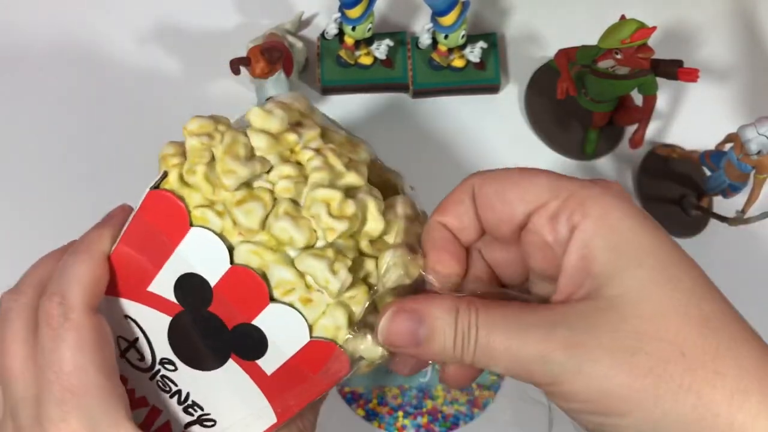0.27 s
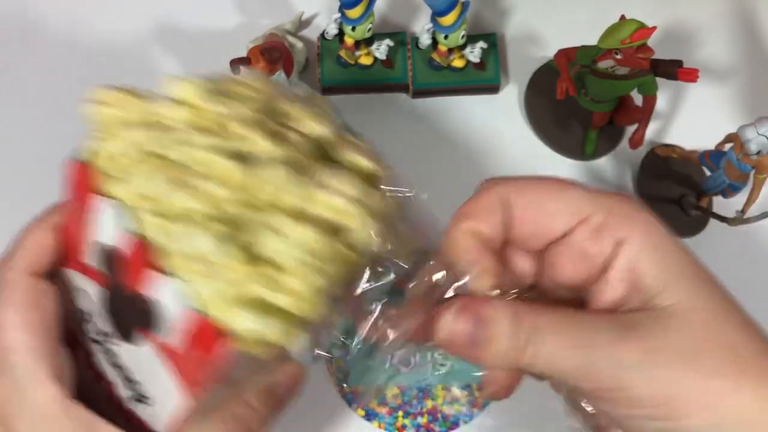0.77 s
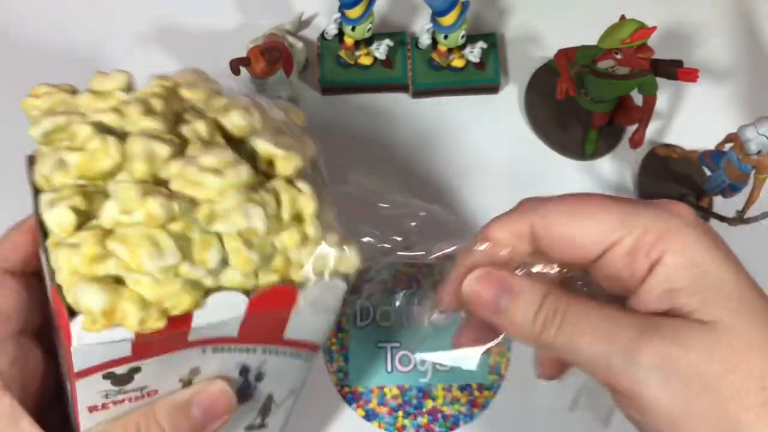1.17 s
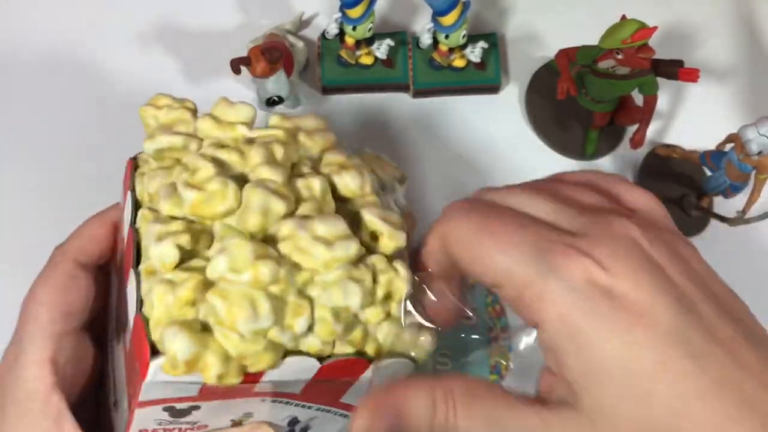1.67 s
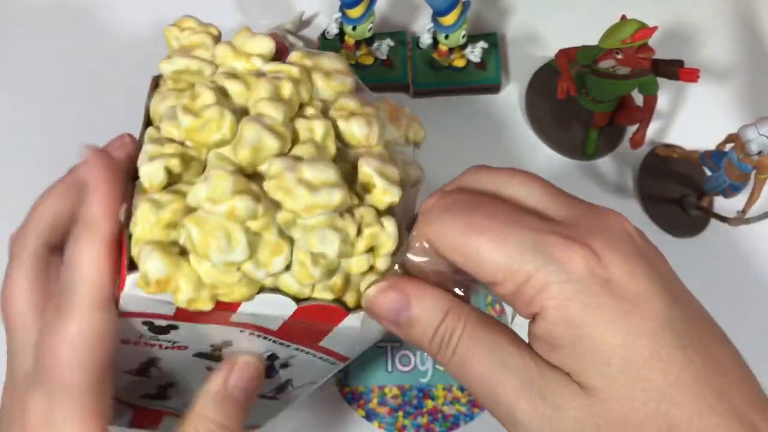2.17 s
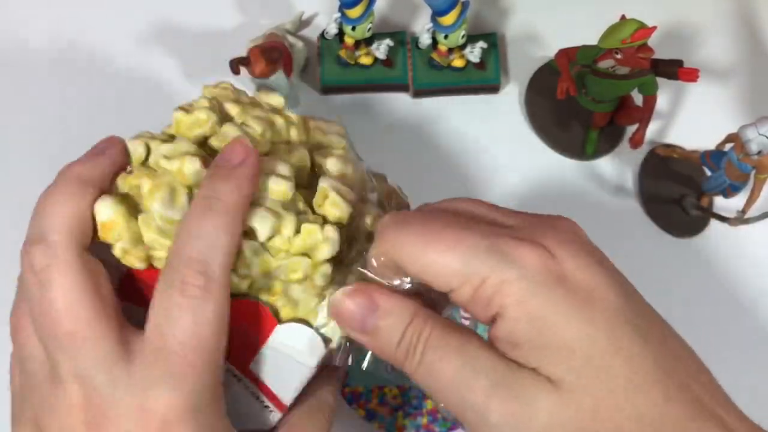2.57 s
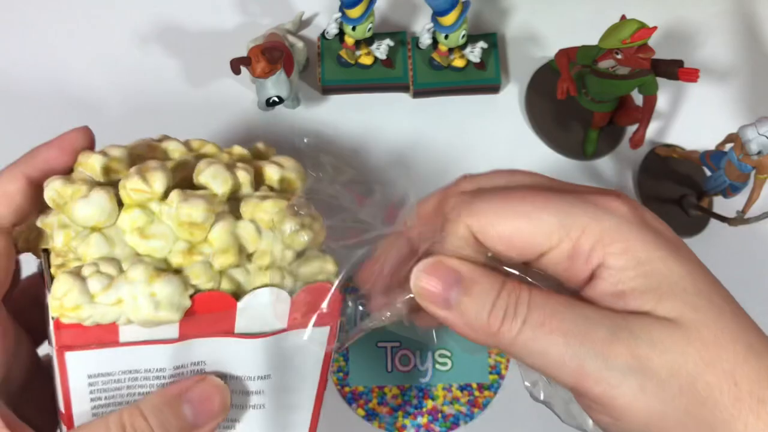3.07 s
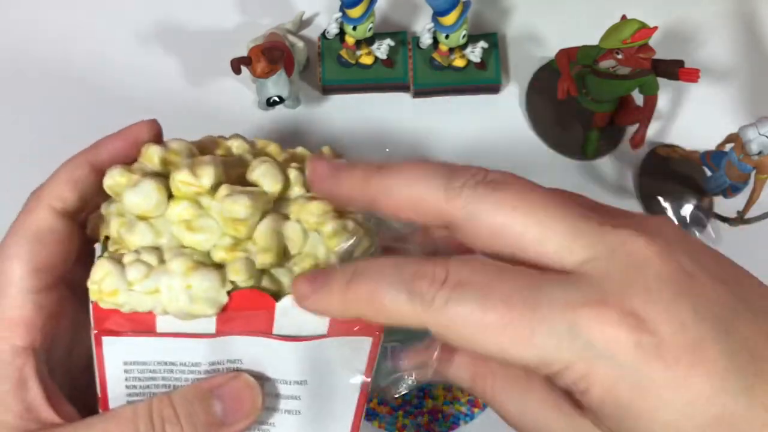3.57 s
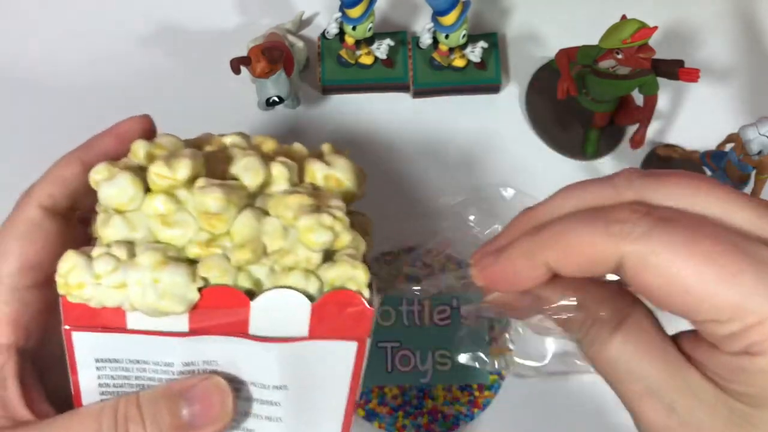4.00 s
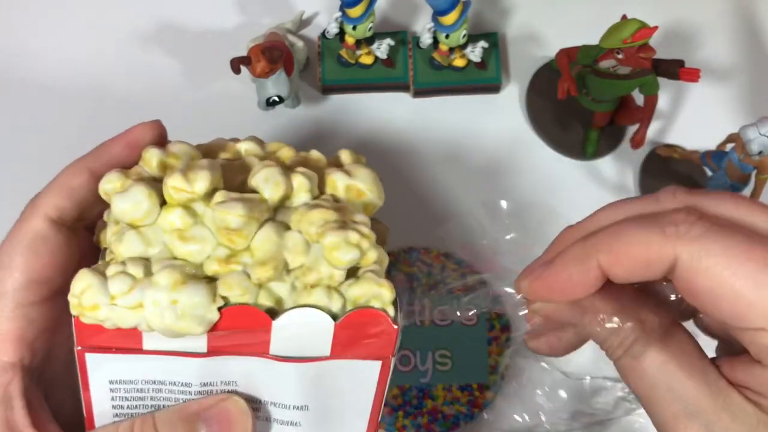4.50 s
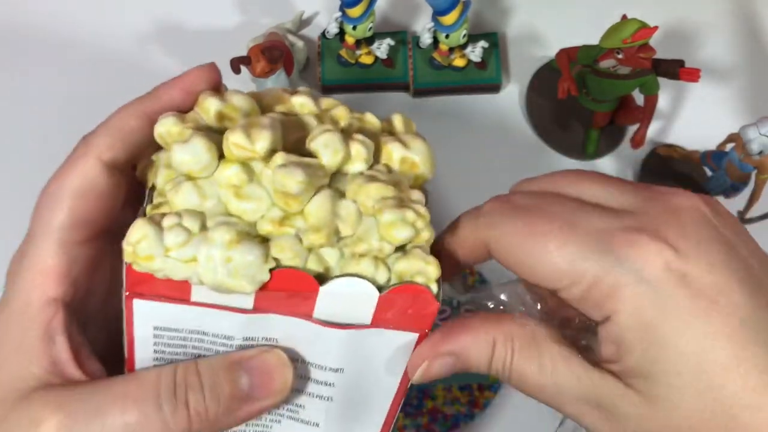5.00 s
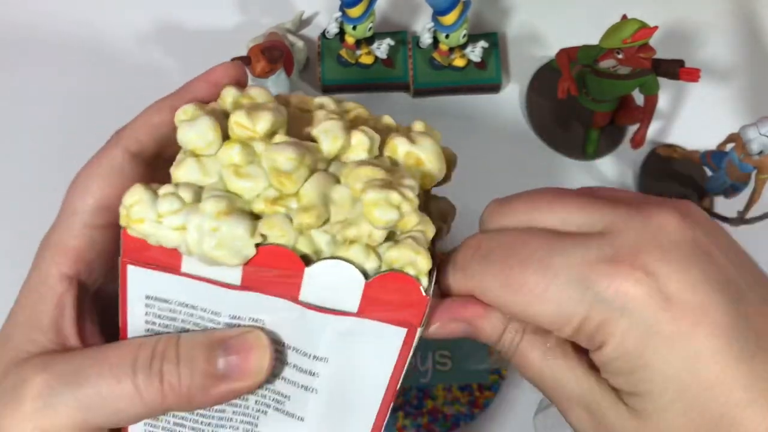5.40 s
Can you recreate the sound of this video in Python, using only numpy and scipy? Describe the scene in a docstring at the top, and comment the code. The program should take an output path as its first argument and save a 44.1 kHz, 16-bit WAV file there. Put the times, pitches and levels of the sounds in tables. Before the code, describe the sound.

Hands work thin stiff plastic film off a light cardboard box, heard very close in a small room. Scattered crackles lead to one loud ripping burst before one second, then uneven crinkling, a quieter lull of small ticks, a second loud flurry near three seconds, and looser rustling with dull finger bumps until two last sharp snaps.

```python
"""In a small room, close by, hands peel clear plastic film off a cardboard box.
Each crease that buckles is a burst of noise lasting milliseconds, which rings a facet of film and knocks the box.
With every pull, tiny creases crackle and the film rustles over itself as a train of random impulses.
The fingers bump the box with soft resonant swells; the box rings on, the walls answer, the air murmurs."""
import sys
import numpy as np
from scipy import signal
from scipy.fft import rfft, irfft, next_fast_len
from scipy.io import wavfile

SR = 44100
rng = np.random.default_rng(int(sys.argv[2]) if len(sys.argv) > 2 else 0)


def write(x):
    x = np.atleast_2d(x).T
    wavfile.write(sys.argv[1], SR, np.round(np.clip(x, -1, 1) * 32767).astype(np.int16))


N = 249165


def from_db(db):
    """Amplitude ratio: twenty decibels are a factor of ten."""
    return 10 ** (np.asarray(db) / 20)


def unit_energy(x):
    """Energy normalisation: the squares of each row sum to one."""
    return x / np.sqrt(np.sum(x ** 2, axis=-1, keepdims=True) + 1e-20)


def rms_one(x):
    """Power normalisation: the mean square becomes one."""
    return unit_energy(x) * np.sqrt(len(x))


def normal(*shape):
    """Gaussian scatter, limited to two standard deviations."""
    return np.clip(rng.standard_normal(shape), -2, 2)


def at_hz(points, hz):
    """Log-frequency interpolation: a spectrum runs straight between its points."""
    known_hz, values = np.transpose(points)
    return np.interp(np.log(np.maximum(hz, 1)), np.log(known_hz), values)


def coloured(x, points):
    """Minimum phase: folding the cepstrum gives the causal filter with a given spectrum."""
    size = next_fast_len(x.shape[-1]) * 2
    gain = from_db(at_hz(points, np.fft.rfftfreq(size, 1 / SR)))
    cepstrum = irfft(np.log(gain))
    cepstrum[1:size // 2] *= 2
    cepstrum[size // 2 + 1:] = 0
    response = np.exp(rfft(cepstrum))
    return irfft(rfft(x, size) * response)[..., :x.shape[-1]]


def resonance(x, hz, width_hz):
    """Damped resonance: a pole pair, with a gain of one at its peak."""
    radius = np.exp(-np.pi * width_hz / SR)
    zeros = np.array([1, 0, -1]) * (1 - radius ** 2) / 2
    poles = [1, -2 * radius * np.cos(2 * np.pi * hz / SR), radius ** 2]
    return signal.lfilter(zeros, poles, x + 1e-18)


# Spectrum of the still room. Each row: frequency in Hz, relative density in dB per Hz.
AIR = [(15, -8), (35, 6), (55, -7.5), (90, -13.5), (140, -17), (230, -9.5), (400, -12), (700, -19.5),
       (2000, -24), (8000, -32), (16000, -45)]


def air(level_db=-56):
    """Stationary background noise: Gaussian noise shaped by a fixed spectrum."""
    return from_db(level_db) * rms_one(coloured(rng.standard_normal(N), AIR))


# Colour of the sound thrown back by the walls. Each row: frequency in Hz, gain in dB.
ROOM_COLOUR = [(100, 3.5), (400, 4), (2800, -3.5), (6000, 0), (10000, -6), (16000, -8)]
# Reverberation time of the room. Each row: frequency in Hz, time to fall by 60 dB in seconds.
ROOM_T60 = [(150, 0.24), (1000, 0.39), (3500, 0.4), (8000, 0.22), (16000, 0.39)]


def room(x, wet_db=-10.5, first_echo_s=0.0015):
    """Reverberation: diffuse echoes are noise that decays exponentially, at its own rate in each band."""
    t = np.arange(SR // 2) / SR
    edges_hz = np.r_[0, np.geomspace(200, SR / 2, num=9)]
    hz = np.fft.rfftfreq(len(t), 1 / SR)
    echoes = rfft(rng.standard_normal(len(t)))
    tail = 0
    for low, high in zip(edges_hz, edges_hz[1:]):
        band = irfft(echoes * ((hz >= low) & (hz < high)), len(t))
        t60_s = at_hz(ROOM_T60, (low + high) / 2)
        tail = tail + band * np.exp(-np.log(1000) * t / t60_s)
    onset = np.clip(t / first_echo_s - .5, 0, 1)
    tail = coloured(unit_energy(tail * onset), ROOM_COLOUR)
    return from_db(wet_db) * signal.fftconvolve(x, tail)[:N]


def turning_walls(x, turn_hz=0.746):
    """Changing direction: as the sheet turns it faces different walls, so two echo patterns trade places."""
    angle = 2 * np.pi * turn_hz * np.arange(N) / SR
    return room(x * np.cos(angle)) + room(x * np.sin(angle))


# Fingers bump and rub the box. Each row: start in seconds, rms level in dB, pitch in Hz, length in seconds.
GRIP = [(1.153, -37, 298, 0.032), (1.202, -60, 65, .12), (1.53, -48.5, 94.5, 0.042),
        (1.773, -56, 51.3, 0.3), (1.799, -40.5, 322.6, 0.019), (2.147, -54.5, 603, 0.058),
        (2.273, -55.5, 197, 0.055), (2.406, -57.5, 553, .11), (2.615, -64, 64.5, 0.18),
        (2.734, -41.5, 980, 0.037), (2.816, -42, 410, 0.054), (3.15, -50.5, 192, 0.089),
        (3.215, -53, 232, 0.041), (3.438, -47, 212.2, 0.046), (3.773, -42.5, 376, 0.046),
        (4.093, -47.5, 416, 0.032), (4.651, -46, 210.4, 0.033), (4.782, -42, 157, 0.032),
        (5.011, -50.5, 844, 0.058), (5.501, -52, 665, 0.068), (5.569, -33, 403, 0.056)]


def fingers(width=0.9):
    """Soft contact: skin spreads the force over time, so noise swells dully in a broad resonance."""
    out = np.zeros(N + SR)
    for s, level_db, hz, length_s in GRIP:
        swell = np.sin(np.pi * np.linspace(0, 1, int(length_s * SR)) ** 0.64) ** 2
        push = resonance(rng.standard_normal(SR), hz, width * hz)
        push = resonance(push, hz, width * hz)[-len(swell):]
        start = int(s * SR)
        out[start:start + len(swell)] += from_db(level_db) * rms_one(push * swell)
    return out[:N]


# Resonances of the box. Each row: frequency in Hz, width in Hz, gain in dB relative to one another.
BOX = [(365, 35, -3.5), (469, 18, -0.5), (583, 80, -5.5), (711, 15, 2), (886.6, 27, 9.5), (1260, 11, -30)]


def box(x, level_db=-3.0):
    """Modal resonance: the film excites the modes of the hollow box, which ring on briefly."""
    modes = sum(from_db(db) * resonance(x, hz, width_hz) for hz, width_hz, db in BOX)
    return from_db(level_db) * modes


# The hands pull, peel or gather the film. Each row: start in seconds, hold in seconds, effort in dB,
# pitch in Hz of the facet that the grip leaves free to ring.
PULLS = [(0, 0.018, -30.5, 2830), (0.243, 0.06, -38, 2692), (0.42, 0.051, -38, 2980),
         (0.538, 0.059, -43.5, 4600), (0.764, 0.037, -19, 3770), (0.931, 0.078, -42.5, 2570),
         (1.052, 0.11, -36.5, 3800), (1.236, 0.033, -48, 3800), (1.449, 0.048, -32, 3390),
         (1.541, 0.0079, -29.5, 3260), (1.73, 0.059, -44, 2640), (1.94, .06, -49.5, 3070),
         (2.084, 0.28, -53, 2850), (2.543, 0.054, -42, 2330), (2.764, 0.13, -36, 2790),
         (3.125, 0.0723, -47, 3880), (3.296, 0.2, -40.5, 3970), (3.647, 0.2, -35, 3850),
         (4.028, 0.052, -48, 2680), (4.547, 0.24, -35, 3970), (4.923, 0.031, -52.5, 2280),
         (5.17, 0.068, -44, 2280), (5.55, 0.014, -47, 3840)]


def effort(s, tighten_s=0.022, relax_s=0.033, held_db=-65):
    """Power addition: each pull tightens, holds and relaxes exponentially, over the stir of held film (dB)."""
    power = from_db(held_db) ** 2
    for start, hold_s, level_db, _ in PULLS:
        before = np.maximum(start - s, 0) / tighten_s
        after = np.maximum(s - start - hold_s, 0) / relax_s
        power = power + (from_db(level_db) * np.exp(-before - after)) ** 2
    return 10 * np.log10(power)


def facet_pitch(s, spread):
    """Free vibrating area: the nearest pull frees a facet and sets its pitch, scattered in octaves."""
    start, hold_s, _, hz = np.transpose(PULLS)
    distance = np.abs(s[:, None] - start - hold_s / 2) - hold_s / 2
    nearest = np.argmin(distance, axis=1)
    return hz[nearest] * 2 ** (spread * normal(len(s)))


# Film sliding over film. Each row: frequency in Hz, relative density in dB per Hz.
SLIDE = [(150, -18), (450, -5.5), (1000, -2.5), (1600, -0.5), (2700, -3.5), (4100, -5.5), (5500, -7),
         (10000, -9), (16000, -25)]


def rustle(per_s=4000, offset_db=-7.5, catch_spread_db=5.0):
    """Stick-slip friction: film slides over film and card in thousands of minute, unequal catches."""
    sizes = from_db(catch_spread_db * normal(N))
    catches = (rng.random(N) < per_s / SR) * rng.standard_normal(N) * sizes
    work = from_db(effort(np.arange(N) / SR) + offset_db)
    return work * rms_one(coloured(catches, SLIDE))


# Voice of the box when knocked. Each row: frequency in Hz, relative gain in dB.
KNOCK = [(50, -16.5), (130, -3.5), (220, -4.5), (380, 3.5), (600, 4.5), (1150, 3.5), (1700, -4),
         (4000, -68)]
# Voice of the flexing sheet. Each row: frequency in Hz, relative gain in dB.
FLEX = [(500, -36), (1200, -6), (1850, -13.5), (2250, -1), (2800, 3), (3350, -1.5), (4000, 3.5),
        (5200, -4.5), (7000, -21), (14000, -74.5)]
# Voice of the crease itself. Each row: frequency in Hz, relative gain in dB.
CRACK = [(2000, -43), (4500, -15), (6200, 2.5), (8000, 0.5), (10500, 2.5), (13000, -5), (16000, -13.5)]


def buckle(rows, swell_per_ms=0.039, shaking=0.39, facet_q=10, facet_db=-5.0, flutter_db=-3.0,
           treble_flutter_db=-4.5, flutter_ms=7.74, gain_db=24.0):
    """Snap-through buckling: a crease gives way in a volley of slips, ringing the facet of film beside it."""
    s, level_db, knock_db, treble_db, length_ms, facet_hz = np.transpose(rows)
    length = length_ms[:, None]
    ms = np.arange(1024) * 1000 / SR
    # a short snap starts at once, a long volley swells
    rise_ms = swell_per_ms * length ** 2
    slips = rng.standard_normal((len(s), len(ms))) * (1 - np.exp(-ms / rise_ms))
    volley = unit_energy(np.exp(-(ms / np.maximum(length, .3)) ** 2))
    # the shock runs on through the crumpled sheet, weaker in the treble; long volleys shake it more
    flutter = unit_energy(np.exp(-ms / flutter_ms)) * length ** shaking
    shock = slips * np.hypot(volley, from_db(flutter_db) * flutter)
    crack = slips * np.hypot(volley, from_db(treble_flutter_db) * flutter)
    treble = from_db(treble_db)[:, None] * unit_energy(coloured(crack, CRACK))
    sheet = unit_energy(coloured(shock, FLEX)) + treble
    # small facets ring high and briefly, large ones low and longer
    facet = np.array([resonance(push, hz, hz / facet_q) for push, hz in zip(crack, facet_hz)])
    film = unit_energy(unit_energy(sheet) + from_db(facet_db) * unit_energy(facet))
    knock = from_db(knock_db)[:, None] * unit_energy(coloured(shock, KNOCK))
    snapping = from_db(level_db + gain_db)[:, None] * (film + knock)
    out = np.zeros(N + len(ms))
    for start, snap in zip(np.clip(s * SR, 0, N).astype(int), snapping):
        out[start:start + len(ms)] += snap
    return out[:N]


def fine_crackle(count=800, busy_db=-33.0, crowding=.6, tick_db=-34.0, follows=0.54, knock_db=-25.0,
                 treble_db=1.0, colour_db=5.0, length_ms=0.3, facet_spread=0.36):
    """Random point process: few tiny creases tick in held film, a louder crowd as it is worked."""
    s = rng.uniform(0, N / SR, count)
    taut, bright, long = normal(count, 3).T
    work_db = effort(s) - busy_db
    gives_way = rng.random(count) < from_db(crowding * work_db)
    creases = np.column_stack([s, tick_db + follows * work_db, knock_db + colour_db * taut,
                               treble_db + colour_db * bright, length_ms * np.exp(.5 * long),
                               facet_pitch(s, facet_spread)])
    return buckle(creases[gives_way])


def neighbours(chance=.65, lag_s=.008, scatter_s=.009, weaker_db=-12.0, spread_db=1.5, length_ms=.7,
               facet_spread=0.73):
    """Triggered release: a smaller crease beside a loud one often gives way just before or after it."""
    s, level_db, knock_db, treble_db, _ = np.transpose(SNAPS)
    when, size, bright = normal(len(s), 3).T
    creases = np.column_stack([s + lag_s + scatter_s * when, level_db + weaker_db + spread_db * size,
                               knock_db, treble_db + spread_db * bright, np.full(len(s), length_ms),
                               facet_pitch(s, facet_spread)])
    return buckle(creases[rng.random(len(s)) < chance])


def peel(start_s=.735, length_s=.095, count=110, level_db=-27.0, ends_db=6.5, spread_db=1.5,
         knock_db=-16.5, treble_db=-0.5, length_ms=0.74, facet_spread=.6):
    """Progressive detachment: film tears free in one pull, a dense run of slips that is loudest midway."""
    along = (np.arange(count) + rng.random(count)) / count
    s = start_s + length_s * along
    slip_db = level_db - ends_db * (2 * along - 1) ** 2 + spread_db * rng.standard_normal(count)
    voice = np.tile([knock_db, treble_db, length_ms], (count, 1))
    return buckle(np.column_stack([s, slip_db, voice, facet_pitch(s, facet_spread)]))


# The loudest creases that buckle. Each row: start in seconds, level in dB before the common gain of buckle(),
# box knock in dB relative to the film (strong where the film is taut), treble in dB relative to the flexing
# sheet, length of the volley in ms.
SNAPS = [(0.0235, -25.5, -11, -2, 0.9), (0.0374, -30.5, -19.5, 3, 1.4), (0.0832, -30.5, -24, 20, 0.84),
         (0.094, -19.5, -43, 2.5, 0.39), (0.1527, -32, -33, 1, 0.75), (0.2829, -31.5, -26, -9.5, 1.36),
         (0.3778, -27, -43, 1.5, 2.2), (0.4058, -33.5, -25, 8, 0.33), (0.4219, -29.5, -37, 1.5, 2.2),
         (0.4302, -26, -24, 3, 0.98), (0.5036, -31.7, -33, 25, 0.27), (0.5644, -22.5, -27, -1, 0.89),
         (0.7146, -7, -15.5, 6.5, 2.2), (0.7352, -16.5, -16, 10, 2.5), (0.7503, -12.5, -16.5, 9, 1.8),
         (0.7689, -13, -33, 5, 6.2), (0.7952, -12, -23, 1, 4.7), (0.9148, -24, -20, 8, 2.7),
         (1.036, -22.0, -13, -7.5, 3.7), (1.0542, -22.5, -13, 1.5, 1.6), (1.0666, -30.7, -7, -1, 3.3),
         (1.1074, -29, -7, -5.5, 4.8), (1.1176, -23.5, -7.5, 0, 3.8), (1.1289, -25, -11, -1, 2.16),
         (1.1628, -16.5, -8.5, 2.5, 3.1), (1.1846, -24.5, -34, -2, 1.1), (1.2564, -28.1, -13, 3, 2.2),
         (1.2848, -22.8, -10, 2, 1.6), (1.3342, -27.5, -13.5, 0.5, 0.4), (1.4084, -21.5, -12, 5.5, 1.83),
         (1.4936, -20.5, -13, -0.5, 5.3), (1.533, -19.5, -25, -1, 1.3), (1.5436, -16, -11, 10, 4.9),
         (1.6986, -31, -12, 8, 1.4), (1.7673, -32, -5, 13, 1.2), (1.7864, -33.5, -8, 5, 5.4),
         (1.835, -37.5, -16, 13, 0.49), (1.8669, -34.5, -4.5, 3, 2.2), (1.8931, -29.5, -40, -1, 0.57),
         (1.9188, -33, -19, 7, 0.73), (1.9439, -29, -30, 16, 1.1), (1.9788, -37.5, -26, 25, 0.72),
         (2.1025, -26.8, -14.5, 5.5, 0.19), (2.1142, -33, -15, -9, 0.47), (2.1965, -36.4, -9, 5, 1.53),
         (2.2738, -32, -11, 0.5, 1.5), (2.3547, -28, -19, -10, 1), (2.4239, -33.5, -11.5, -14, 1.05),
         (2.502, -32, -11, 7, 2.54), (2.5413, -23, -28, 17, 0.99), (2.5825, -19, -40, 0, 1.05),
         (2.6535, -29, -9, -10, 2.1), (2.7807, -17, -14.5, 18, 0.54), (2.784, -12.9, -10, 17, 2.6),
         (2.822, -12.5, -8, 8.5, 1.5), (2.8513, -17.5, -18, 3, 6.8), (2.8778, -15.4, -11, 3.5, 2.9),
         (2.8981, -20.5, -11, 8, 1.6), (2.9251, -21, -15, 9, 1.4), (2.9983, -30.5, -16, 9, 1.0),
         (3.0419, -27, -12, -2.5, 1.4), (3.0751, -30, -10.5, 6, 1.3), (3.1527, -25.5, -15, 3, 3),
         (3.1761, -27.5, -12, 6, 1.7), (3.221, -19, -13, 5, 3.1), (3.2848, -28, -33, 21, 1.7),
         (3.308, -33, -26, -8, 2), (3.3766, -24, -13.5, 2.5, 1.6), (3.457, -27.5, -5.5, 0, 2.8),
         (3.5404, -27.5, -9.5, 2, 0.72), (3.6488, -18.0, -9.5, 4.5, 1.3), (3.7268, -22.5, -8.5, 6, 5.9),
         (3.791, -12.5, -12, -2.5, 1.8), (3.8672, -30.5, -9, -7, 1.8), (3.9905, -24.5, -9.5, 2, 0.91),
         (4.048, -27, -6, 4, 2.4), (4.0641, -29, -9, 5, 1.9), (4.0738, -31, -11, 3, 1.1),
         (4.1342, -35, -18.5, 8, 2.3), (4.1591, -33.5, -37, 9, 0.61), (4.2997, -29.5, -4.5, 1.5, 1.1),
         (4.406, -39.5, -3, -3, 2.7), (4.4878, -34.2, -19, -2.5, 0.49), (4.5551, -30, -7.5, 13, 2.16),
         (4.6182, -30.5, -4, -1, 1.9), (4.637, -24.5, -27, -1.5, 1.1), (4.6577, -24.5, -9, -1, 3.6),
         (4.706, -17.8, -12.5, -5, 4.2), (4.7564, -24.5, -19, -3, 1.9), (4.7826, -23, -9, 0, 1.9),
         (4.809, -24.5, -33, -11, 0.89), (4.9189, -30, -27, -9, 0.94), (4.9348, -27.5, -40, -1, 0.89),
         (5.0679, -28, -33, 8, 0.47), (5.1304, -33.5, -37, -0.5, 0.8), (5.174, -28.8, -40, 13, 7),
         (5.1979, -27.3, -15.5, 1, 1.35), (5.2563, -29.5, -37, -7, 3.5), (5.2916, -29, -13.5, 3, 0.42),
         (5.2977, -31, -16, 5, 0.75), (5.383, -34.5, -17, 21, 0.64), (5.542, -13, -11, 2.5, 0.89),
         (5.5776, -14.5, -19.5, 7.5, 0.85), (5.5969, -25, -9, 7, 0.69)]


def snaps(facet_spread=0.18):
    """Impulsive excitation: each loud crease rings the facet that is free at the time."""
    start_s = np.array(SNAPS)[:, 0]
    return buckle(np.column_stack([SNAPS, facet_pitch(start_s, facet_spread)]))


def scene():
    """Superposition: film, box and fingers sound directly and by way of the walls, over the still air."""
    film = snaps() + neighbours() + peel() + fine_crackle() + rustle()
    handled = film + box(film) + fingers()
    return (handled + turning_walls(handled) + air())[None]


def record(dry, overload=.9, cutoff_hz=16000):
    """Overload and band limit: the sharpest snaps are clipped, then a steep low-pass cuts the top."""
    clipped = np.clip(dry, -overload, overload)
    low_pass = signal.ellip(10, .2, 80, cutoff_hz, fs=SR, output="sos")
    return signal.sosfilt(low_pass, clipped)


dry = scene()
out = record(dry)
write(out)
```